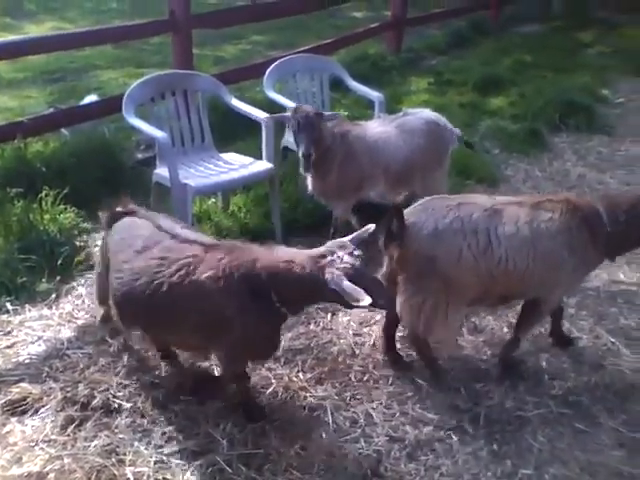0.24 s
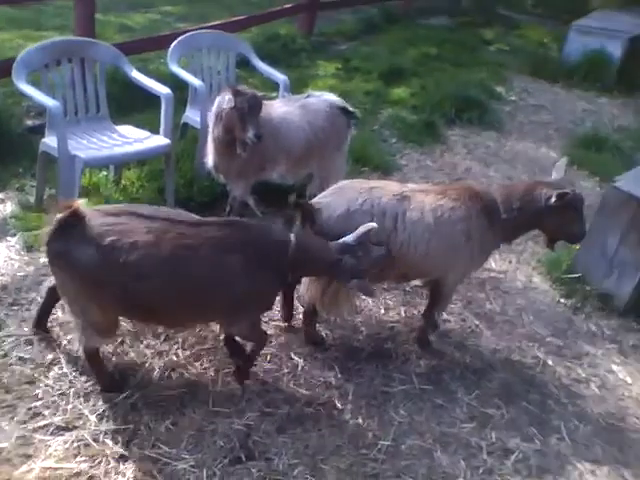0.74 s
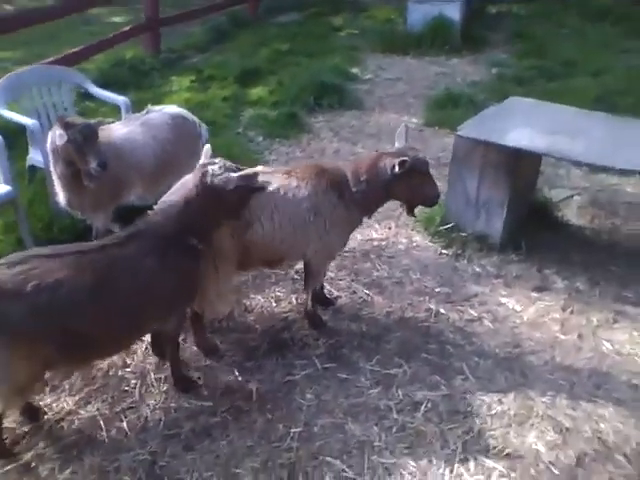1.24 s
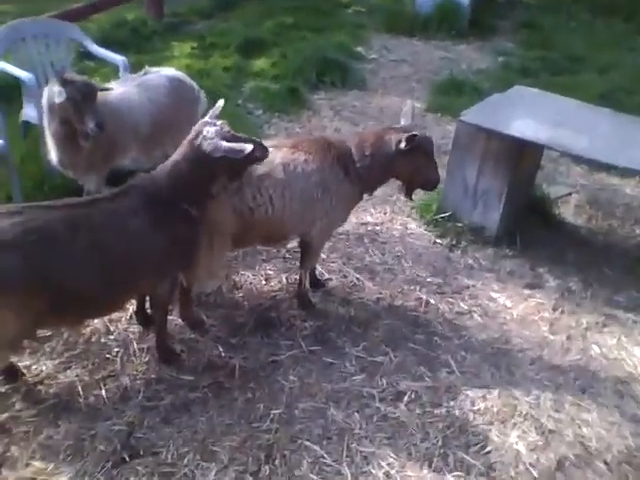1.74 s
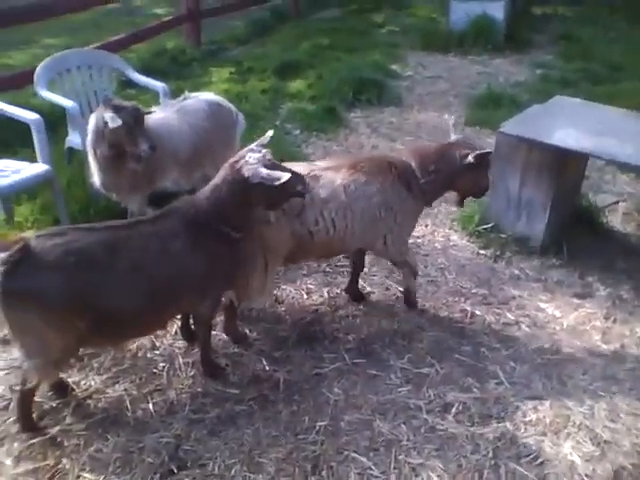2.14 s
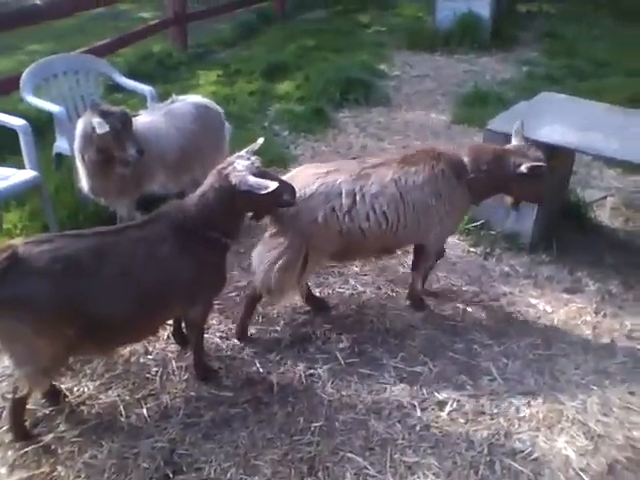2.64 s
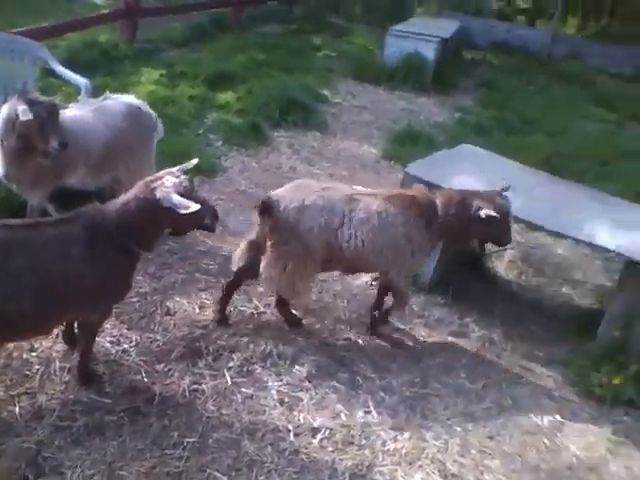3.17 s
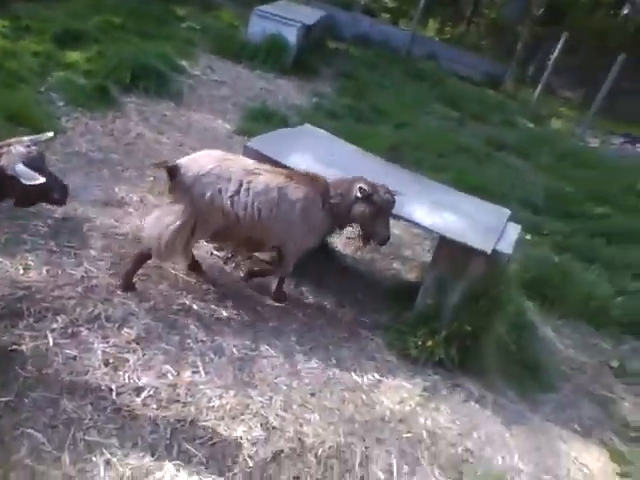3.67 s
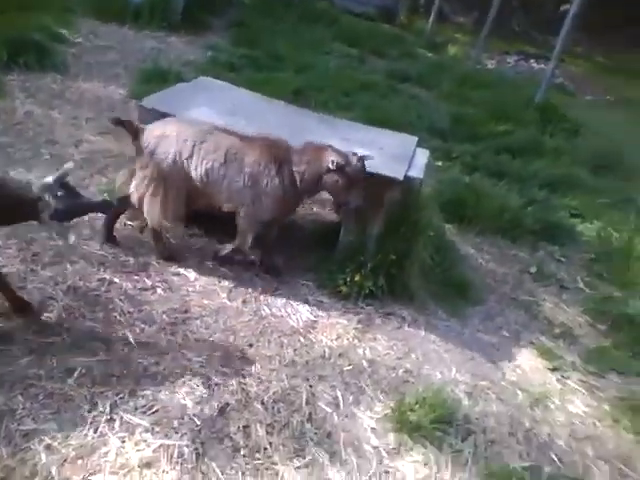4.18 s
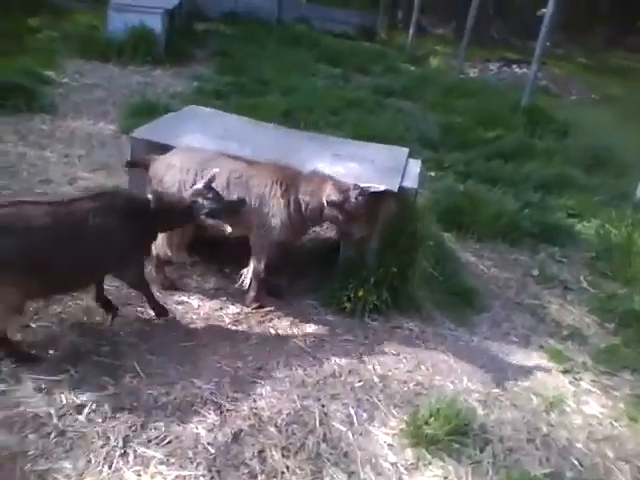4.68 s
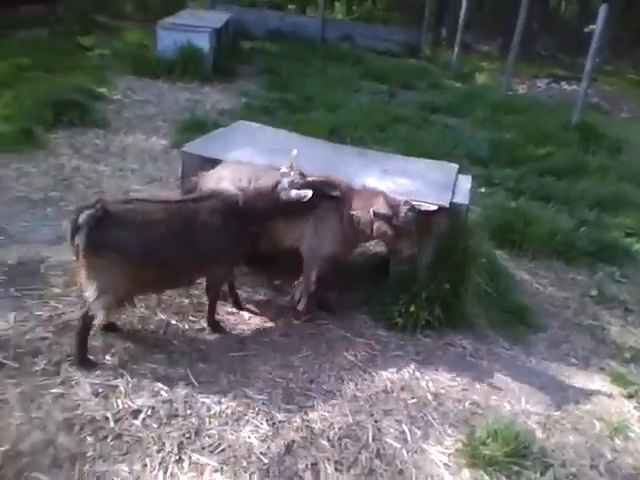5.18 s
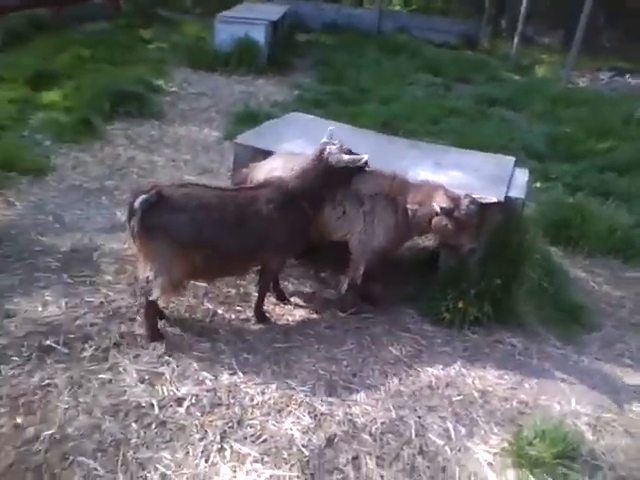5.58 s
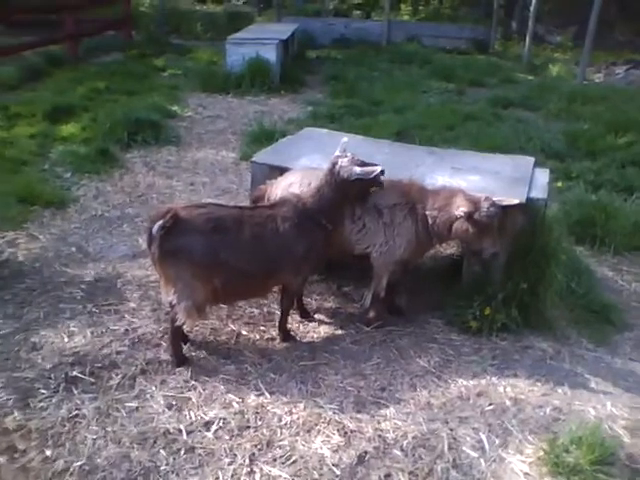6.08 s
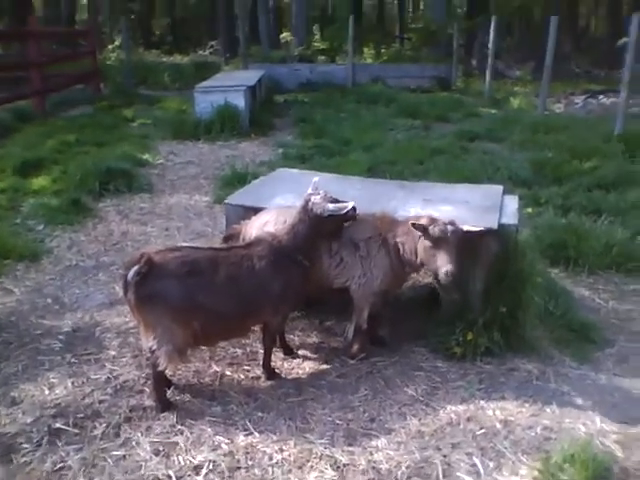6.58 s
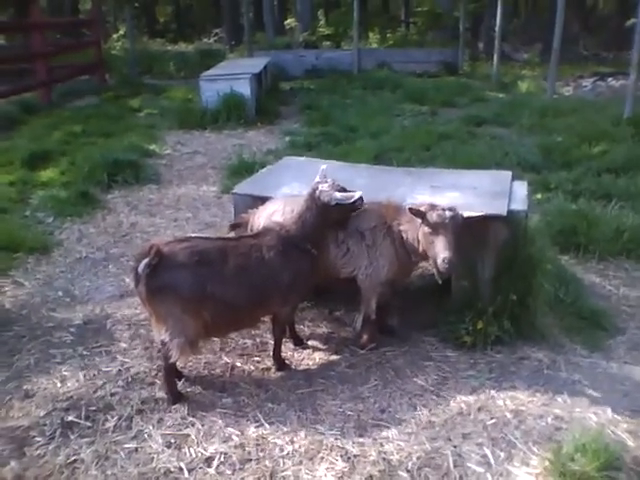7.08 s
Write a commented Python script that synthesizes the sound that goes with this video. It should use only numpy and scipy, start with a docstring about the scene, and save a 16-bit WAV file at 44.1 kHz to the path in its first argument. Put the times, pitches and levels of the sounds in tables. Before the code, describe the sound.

In a quiet outdoor pen, hooves rustle and snap dry straw. A nearby goat lets out a short, hoarse, blubbering bleat with wet lip smacks, followed by soft tongue pops. A bird whistles faintly far away as the steps continue. Then comes a longer throbbing bleat that breaks off and resumes, and more tongue pops. A light breeze nudges the microphone.

```python
"""First come a soft outdoor hush, a faint far note and hooves rustling and snapping straw in a pen.
A male goat, courting a female, gives a short and then a long blubbering bleat. Each is a run of hoarse
throbs, about eleven a second: pushes of air that slap his vocal folds together and ring his throat.
His lips smack, and his tongue flaps after each bleat. A bird calls far off between the two bleats,
and a breeze nudges the microphone."""
import sys
import numpy as np
from scipy import signal
from scipy.io import wavfile
from scipy.ndimage import uniform_filter1d

SR = 44100
rng = np.random.default_rng(int(sys.argv[2]) if len(sys.argv) > 2 else 0)


def dump(signal):
    """Clip the signal to [-1, 1] and save it as 16-bit WAV at the path in sys.argv[1]."""
    limited = np.clip(np.atleast_2d(signal).T, -1, 1)
    pcm = np.round(limited * 32767).astype(np.int16)
    wavfile.write(sys.argv[1], SR, pcm)


N = 322812

# the pitches at which the goat's nose rings: frequency_hz, gain_db
NOSE_TONE = [(780, -35), (900, -9), (1010, -2), (1130, -14), (1400, -12), (1530, 0), (1700, -15),
             (1880, -7), (2880, -10), (3100, -1), (3270, -6), (3470, 2), (3750, -7.5), (4130, -7.5),
             (4450, -21), (6000, -45)]


def amp(db):
    """Turns decibels into a number to multiply by."""
    return 10 ** (np.asarray(db) / 20)


def unit(x):
    """Scales a sound to an average (rms) level of one."""
    return x / np.sqrt(np.mean(x ** 2) + 1e-20)


def peaked(x, db):
    """Scales a sound so that its peak is at db."""
    return amp(db) * x / abs(x).max()


def read(points, hz):
    """Looks up a value between the rows of a frequency table."""
    row_hz, value = np.transpose(points)
    return np.interp(np.log(hz + 1), np.log(row_hz + 1), value)


def add(mix, start_s, sound):
    """Mixes a sound in at start_s."""
    part = mix[max(round(start_s * SR), 0):][:len(sound)]
    part += sound[:len(part)]


def colour(x, points):
    """Makes each frequency louder or softer, as a table says."""
    log_gain = np.log(amp(read(points, abs(np.fft.fftfreq(4096, 1 / SR)))))
    taps = np.fft.ifft(np.exp(np.conj(signal.hilbert(log_gain)))).real  # rings only after a sound
    return signal.fftconvolve(x, taps[:len(taps) // 2])[:len(x)]


def resonate(x, hz, width_hz, order=2):
    """Makes a sound ring around a pitch, which may move."""
    turn = np.exp(2j * np.pi * np.cumsum(hz * np.ones(len(x))) / SR)
    fade = np.exp(-np.pi * width_hz / SR)
    shifted = x / turn
    for _ in range(order):
        shifted = signal.lfilter([1 - fade], [1, -fade], shifted)
    return 2 * (turn * shifted).real


def wander(samples):
    """A random drift; more samples make it slower."""
    return unit(uniform_filter1d(rng.standard_normal(N), size=samples))


def burst(decay_s, crumble=0.2, count=2000):
    """A click with a short crumbling tail."""
    click = crumble * rng.standard_normal(count) * np.exp(-np.arange(count) / SR / decay_s)
    click[0] += 1
    return click


def air():
    """Outdoor hush, a breeze that comes and goes, a faint far drone and soft nudges of wind."""
    # the tone of the open air: frequency_hz, gain_db
    hush_tone = [(15, -41.5), (25, -17.5), (90, -3.5), (150, -8.5), (190, -10), (284, -14.5), (400, -14.5),
                 (480, -14), (812, -14.5), (981, -12), (1430, -20), (4100, -22.5), (15800, -28)]
    # wind bumping the microphone: time_s, strength_db
    nudges = [(2.68, -49), (4.359, -35), (6.229, -45.5), (6.254, -43), (6.313, -43.5), (6.441, -46)]
    hush = amp(-57) * unit(colour(rng.standard_normal(N), hush_tone))
    gusts = amp(2.4 * wander(6000))
    breeze = amp(-74.5) * unit(resonate(rng.standard_normal(N), hz=73, width_hz=70) * gusts)
    drone = amp(-69) * unit(resonate(rng.standard_normal(N), hz=188, width_hz=30))
    out = hush + breeze + drone
    age = np.arange(3000) / SR / 0.0037
    bump = age * (2 - age) * np.exp(-age)  # a push, then a weaker pull
    for time_s, db in nudges:
        add(out, time_s - .004, peaked(bump, db + .5))
    return out


def far_notes():
    """Thin notes, blurred by distance, that swell and fade."""
    # faint notes from far off: start_s, length_s, pitch_hz, level_db
    notes = [(0, 0.2, 2590, -62), (1.407, 0.21, 2510, -68), (6.3, 0.42, 511, -67)]
    out = np.zeros(N)
    for start_s, length_s, hz, db in notes:
        note = unit(resonate(rng.standard_normal(SR), hz, 0.08 * hz, order=3))[:round(length_s * SR)]
        add(out, start_s, amp(db) * note * np.sin(np.linspace(0, np.pi, len(note))))
    return out


def straw_rustle():
    """Countless tiny cracks in the straw swell under each step."""
    # the rustle between steps, as the goats jostle and come to rest: time_s, level_db
    shuffle = [(0, -55), (.4, -52.5), (.95, -48.5), (1.17, -61), (1.55, -65.5), (3.0, -59.5), (3.76, -60),
               (4.0, -56), (4.5, -49), (4.65, -58), (5.15, -58.5), (5.65, -63), (7.32, -66)]
    # hooves pressing down: peak_s, level_db, decay_s
    steps = [(.19, -52, 0.16), (0.555, -44.5, 0.047), (0.795, -56, 0.079), (1.073, -47.5, .04),
             (1.243, -51.5, 0.024), (2.218, -54, 0.059), (2.472, -50.5, 0.039), (2.77, -59.5, 0.071),
             (3.049, -53, 0.065), (3.29, -52.5, 0.2), (3.608, -55.5, 0.042), (3.86, -48.5, 0.29),
             (4.169, -44, 0.045), (4.417, -52, 0.068), (4.708, -48, .05), (4.812, -43, 0.011),
             (5.482, -48, 0.019)]
    # the tone of straw: frequency_hz, gain_db
    straw_tone = [(300, -6), (1000, -6), (2500, -3.5), (4000, -2), (6500, -1), (9000, -3), (15500, -5.5)]
    t = np.arange(N) / SR
    power = amp(np.interp(t, *np.transpose(shuffle))) ** 2
    for peak_s, db, decay_s in steps:
        away_s = np.maximum((peak_s - t) / 0.41, t - peak_s)  # builds faster than it fades
        press = np.exp(-np.minimum(away_s / decay_s, 20))
        power += (amp(db) * press) ** 2
    cracks = rng.standard_normal(N) * (rng.random(N) < 2500 / SR)  # about 2500 a second
    cracks *= amp(3.17 * np.minimum(rng.exponential(1, N), 4))  # a few stand out
    return unit(colour(unit(cracks) + rng.standard_normal(N), straw_tone)) * np.sqrt(power)


def straw_snaps():
    """Single stalks snap and splinter."""
    # snapping stalks and dry clicks: start_s, peak_db, pitch_hz
    snaps = [(.341, -33.5, 2900), (.415, -31, 5900), (1.955, -36, 5030), (1.98, -38, 4930),
             (2.483, -37, 2600), (2.89, -41, 2380), (3.031, -34, 3600), (3.052, -35, 5670),
             (3.217, -39, 3900), (3.584, -34.5, 5060), (3.651, -30.5, 4570), (5.685, -41, 975),
             (5.725, -41, 1070), (5.811, -40, 900), (6.45, -33, 1000), (6.502, -38, 900)]
    out = np.zeros(N)
    for start_s, db, hz in snaps:
        crack = burst(decay_s=0.0018)
        splinters = 0.14 * rng.standard_normal(len(crack)) * (rng.random(len(crack)) < 130 / SR)
        add(out, start_s, peaked(resonate(crack + splinters, hz, hz * 1.5, order=3), db))
    return out


def tongue_flaps():
    """The hollow of the mouth pops, then rings lower as it closes."""
    # flaps of the tongue: start_s, pop_peak_db, base_pitch_hz
    flaps = [(0.437, -40, 517), (1.536, -38, 417), (1.732, -28.5, 468), (1.927, -38.5, 440),
             (2.152, -44, 438), (5.575, -38.5, 313), (5.751, -33, 467), (5.961, -34.5, 483),
             (6.168, -41.5, 477), (6.41, -43.5, 487)]
    out, t = np.zeros(N), np.arange(2000) / SR
    for start_s, db, hz in flaps:
        pop = np.sin(2 * np.pi * hz * 1.056 * t) * t * np.exp(-t / 0.0016)
        ring = np.sin(2 * np.pi * hz * 0.685 * t) * t * np.exp(-t / 0.0032)
        click = resonate(burst(decay_s=0.0021), hz=1200, width_hz=1800)
        add(out, start_s, peaked(pop, db) + peaked(ring, db - 11.5) + peaked(click, db - 9.5))
    return out


def vocal_folds(count, rate_hz=300, jitter=.33, spread_db=4, puff_s=0.0042, growl_hz=115, growl_db=1):
    """Slack folds slap shut unevenly, harder in time with a growl; each slap comes with a puff of air."""
    gaps, sizes = rng.standard_normal((2, 120))
    slap_s = np.cumsum(np.exp(jitter * gaps)) / rate_hz
    size_db = spread_db * sizes + growl_db * np.sin(2 * np.pi * (growl_hz * slap_s + rng.random()))
    at, slaps = (slap_s * SR).astype(int), np.zeros(count)
    slaps[at[at < count]] = amp(size_db[at < count])
    puffs = signal.lfilter([1], [1, -np.exp(-1 / (puff_s * SR))], slaps) * rng.standard_normal(count)
    return unit(slaps), unit(puffs)


def vowel(time_s):
    """The vowel closes and dulls as each bleat runs out of air."""
    # the throat's upper rings, with levels compared to the throb:
    # time_s, second_ring_hz, third_ring_hz, second_ring_db, treble_db
    vowels = [(.56, 1130, 2360, -3.5, -4), (.62, 1450, 2360, -4.5, -4.5), (.74, 1490, 2160, -19, -8),
              (.80, 1112, 2460, -8, -11), (.89, 1198, 2130, -2, -17.5), (.99, 1148, 2080, 2.5, -20.5),
              (1.09, 1090, 1920, 1.5, -9), (1.19, 956, 1770, -0.5, -20), (1.28, 1143, 2514, -5, -7),
              (4.0, 1030, 2600, 0.5, -11), (4.11, 1280, 2310, -2, 1.5), (4.23, 1345, 2115, -6, -5.5),
              (4.32, 1280, 2200, -1, -6), (4.41, 1433, 2280, -3.5, -6), (4.51, 1357, 2340, -2, -7),
              (4.6, 1420, 2220, 2, -2), (4.68, 1310, 2340, -7.5, -7.5), (4.8, 1360, 2260, -0.5, -9),
              (5.03, 1066, 2400, -10.5, -18.5), (5.191, 1210, 2240, -2, -20), (5.38, 963, 2060, -5, -24.5)]
    times, *columns = np.transpose(vowels)
    return [np.interp(time_s, times, column) for column in columns]


def steady(x, share):
    """Evens out a share of a sound's chance swells, as a steady push of air does."""
    power = abs(uniform_filter1d(unit(x) ** 2, size=400)) + 1e-4
    return x / power ** (share / 2)


def lip_hiss(puffs, drops_per_s=90, drop_s=.003):
    """Air hisses between the lips, and droplets make it sputter."""
    # the tone of the hiss: frequency_hz, gain_db
    hiss_tone = [(2500, -51.5), (3900, 2.5), (4500, -6.5), (5000, 1), (5700, -2.5), (6400, -14),
                 (8000, -17), (12000, -38.5)]
    drops = rng.random(len(puffs)) < drops_per_s / SR
    sputter = 1 + 2.2 * signal.lfilter([1], [1, -np.exp(-1 / (drop_s * SR))], drops)
    return colour(puffs * sputter, hiss_tone)


def smack(db, hz, decay_s):
    """A spray of tiny wet cracks rings the gap between the lips, and the nose."""
    spray = burst(decay_s, crumble=.7)
    return peaked(resonate(spray, hz, width_hz=2400, order=6) + 0.51 * colour(spray, NOSE_TONE), db)


def throb(start, crest, end, db, swell_db, first_hz, opening):
    """One push of air rings the throat as the mouth moves; returns its start time and its sound."""
    # the two bleats: start_s, chest_level_db, nose_above_treble_db
    bleat_tones = [(.5, -48.5, -8.5), (3.9, -43.5, -2)]
    # dips and peaks made by side branches of the throat: frequency_hz, gain_db
    throat_tone = [(310, -3), (400, 3), (480, -1.5), (560, -.5), (740, 0), (840, -7.5), (930, 5.5),
                   (1040, -3), (1145, 5.5), (1230, 1.5), (1500, 4.5), (1720, 4.5), (1900, 9.5)]
    # air rushing over the tongue: frequency_hz, gain_db
    tongue_tone = [(400, -24), (980, 4.5), (1250, 8), (1850, -2.5), (2400, -11), (3000, 11), (3400, -11),
                   (4300, -24), (5500, -32)]
    t = start + np.arange(-900, 5400) / SR
    second_hz, third_hz, second_db, treble_db = vowel((start + end) / 2)
    _, chest_db, nose_db = [row for row in bleat_tones if row[0] < start][-1]
    effort_db = db + 24  # how far above an ordinary throb
    high_db = db + treble_db
    treble_share, dulling_db = 0.38, 4  # the treble takes part of the swell, and sinks over the throb

    # the airflow starts abruptly and is cut off again
    gate = amp(np.interp(t, [start - .0033, start, end, end + .022], [-16.5, 0, 0, -35], -100, -100))
    fall_db = 5.5 + 0.34 * swell_db  # a bigger swell sinks further
    arch_db = np.interp(t, np.maximum.accumulate([start, crest, end]), [-swell_db, 0, -fall_db])
    progress = np.clip((t - start) / (end - start), 0, 1) - .5
    mouth = 1 + opening * progress
    push, gentle_push = amp(arch_db), amp(0.41 * arch_db)
    bright = amp(treble_share * arch_db - dulling_db * progress)

    slaps, puffs = vocal_folds(len(t))
    voiced = colour(slaps + 0.38 * puffs, throat_tone)
    hoarse = .4 * slaps + puffs
    first_ring = steady(resonate(voiced, first_hz * mouth, width_hz=258, order=4), 1.0) * push
    second_ring = steady(resonate(voiced, second_hz * mouth, width_hz=450, order=4), 0.44) * push
    third_ring = steady(resonate(hoarse, third_hz, width_hz=1450, order=6), 0.25) * bright
    chest = resonate(voiced, hz=209, width_hz=192, order=4) * gentle_push
    nose = steady(colour(hoarse, NOSE_TONE), 0.24) * bright
    tongue_air = steady(colour(puffs, tongue_tone), 0.32) * bright
    hiss = lip_hiss(puffs) * gentle_push
    parts = [(first_ring, db), (second_ring, db + second_db), (third_ring, high_db - 0.9),
             (chest, min(chest_db, db - 5)),  # stays under the voice in faint throbs
             (nose, high_db + nose_db), (tongue_air, high_db - 5.5),
             (hiss, -43 + 0.43 * effort_db + 0.46 * treble_db)]
    filled = np.sqrt((end - start) * SR / len(t))  # levels hold for the sounding part
    sound = filled * sum(amp(part_db) * unit(part * gate) for part, part_db in parts)

    # the lips smack as they part, and spit as they meet again
    parting_db = high_db - treble_share * swell_db + 3.5
    add(sound, start - t[0], smack(parting_db, hz=2780, decay_s=.003))
    spit_db = -26.5 + 0.8 * (effort_db + treble_db)
    spit_hz = 4685 * (1 + .07 * rng.standard_normal())
    add(sound, end - .006 - t[0], smack(spit_db, spit_hz, decay_s=.005))
    return t[0], sound


def bleats():
    """The goat pushes out two runs of throbs, with wet smacks of his lips."""
    # one throb a row: start_s, crest_s, end_s, level_db, swell_db, first_ring_hz,
    # opening (the share by which the moving mouth raises the two lower rings)
    throbs = [ (0.549, 0.555, .570, -46.5, 8, 587, 0.17), (0.61, 0.637, .662, -22, 24.5, 600, 0.21),
              (.703, 0.763, .750, -25, -4, 570, -0.072), (.783, 0.811, .838, -16.5, 12.5, 632, 0.089),
              (.867, 0.881, .918, -21.5, 12, 560, 0.14), (0.959, 0.99, 1.006, -18, 13, 597, 0.041),
              (1.052, 1.105, 1.113, -32, 14.5, 550, 0.11), (1.163, 1.181, 1.212, -26.5, 6, 583, 0.06),
              (1.268, 1.27, 1.288, -45, 3, 574, -0.53), (3.979, 4.04, 4.040, -49, 13, 500, .07),
              (4.041, 4.061, 4.085, -41.5, 17, 686, -0.13), (4.105, 4.13, 4.158, -34.5, 21, 630, -0.47),
              (4.203, 4.224, 4.25, -19.5, 16, 684, 0.095), (4.298, 4.34, 4.355, -28, 21.5, 589, 0.18),
              (4.382, 4.412, 4.434, -20.5, 10.5, 660, -0.031), (4.475, 4.515, 4.532, -21.5, 14, 671, 0.26),
              (4.564, 4.634, 4.622, -30.5, -9, 654, 0.036), (4.65, 4.671, 4.717, -23.5, 8, 641, 0.24),
              (4.767, 4.79, 4.848, -28, 11.5, 590, -0.011), (4.984, 4.986, 5.012, -42, 11, 617, -0.084),
              (5.049, 5.063, 5.106, -27.5, 16, 612, -0.11), (5.121, 5.135, 5.143, -43.5, 7, 570, 0.13),
              (5.147, 5.183, 5.2, -25.5, 20, 659, 0.0079), (5.229, 5.272, 5.293, -35, 10, 526, -0.043),
              (5.34, 5.381, 5.394, -28, 9.5, 650, -0.023)]
    # the loudest lip smacks: start_s, peak_db, pitch_hz, decay_s
    smacks = [(.6325, -15, 3380, 0.0036), (0.6443, -10, 3280, 0.0018), (0.6523, -15, 3080, 0.0013),
              (0.7013, -11.5, 2940, 0.002), (0.741, -25, 5080, 0.003), (0.8681, -21.5, 3430, 0.0035),
              (1.105, -29, 4060, .0054), (4.066, -24, 2820, 0.011), (4.24, -14, 3220, 0.0064),
              (4.339, -18, 3200, 0.011), (4.383, -14, 2830, 0.0022), (4.423, -17.5, 3740, 0.0082),
              (4.474, -17.5, 2630, 0.0023), (4.562, -14.5, 2720, 0.0083), (4.696, -11.5, 3470, 0.0078)]
    out = np.zeros(N)
    for row in throbs:
        add(out, *throb(*row))
    for start_s, db, hz, decay_s in smacks:
        add(out, start_s, smack(db, hz, decay_s))
    return out


def bird():
    """A far bird's thin, wavering whistle, strongest an octave above its base pitch."""
    # the falling call: time_s, base_pitch_hz, level_db
    call = [(2.37, 2330, -77), (2.395, 2320, -55), (2.43, 2084, -63.5), (2.52, 2080, -60),
            (2.58, 2043, -56), (2.66, 2020, -60.5), (2.78, 2090, -78)]
    t = np.arange(N) / SR
    times, hz, db = np.transpose(call)
    waver, flicker = wander(60), wander(700)
    phase = 2 * np.pi * np.cumsum(np.interp(t, times, hz) * (1 + .028 * waver)) / SR
    level = amp(np.interp(t, times, db, left=-140, right=-140) + 3.6 * flicker)
    return level * (np.sin(2 * phase) + 0.42 * np.sin(phase))


def pen_echo(x, near_db=-15, far_db=-26.5):
    """Sound bounces quickly off ground and bench, then faintly off fence and trees."""
    # how long the far echo takes to fade by 60 dB: frequency_hz, fade_s
    fade_times = [(200, 1), (600, 0.82), (1200, 0.89), (3000, 0.66), (8000, 0.51)]
    t = np.arange(SR) / SR
    bounces = rng.choice([-1., 1.], SR) * (rng.random(SR) < 2000 / SR)
    near = bounces * (t > .003) * np.exp(-t / 0.0063)
    hz, times, bands = signal.stft(bounces * (t > .02), SR, nperseg=256)
    fade = amp(-60 * times / read(fade_times, hz)[:, None])
    far = signal.istft(bands * fade, SR, nperseg=256)[1][:SR]
    echo = amp(near_db) * near / np.linalg.norm(near) + amp(far_db) * far / np.linalg.norm(far)
    return x + signal.fftconvolve(x, echo)[:N]


def scene():
    """Goat, straw and bird echo in the pen, under the open air."""
    sources = bleats() + tongue_flaps() + straw_rustle() + straw_snaps() + bird()
    return (pen_echo(sources) + far_notes() + air())[None]


def record(dry):
    """A small camera cuts off the very highest treble."""
    treble_cut = signal.firwin(511, cutoff=15950, window=("kaiser", 9), fs=SR)
    return signal.oaconvolve(dry, treble_cut[None], "same")


dry = scene()
out = record(dry)
dump(out)
```